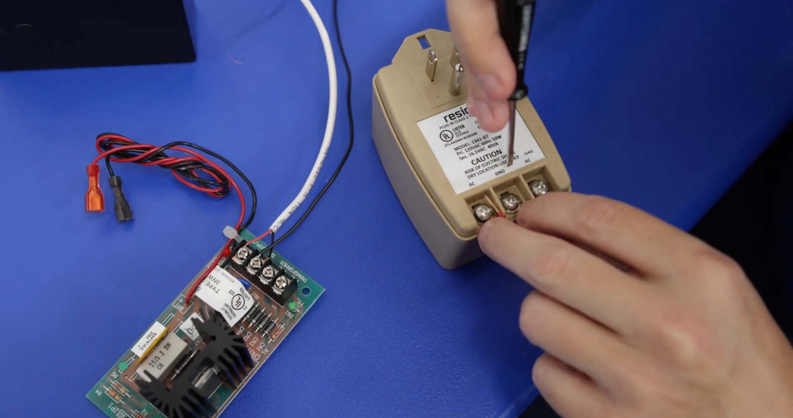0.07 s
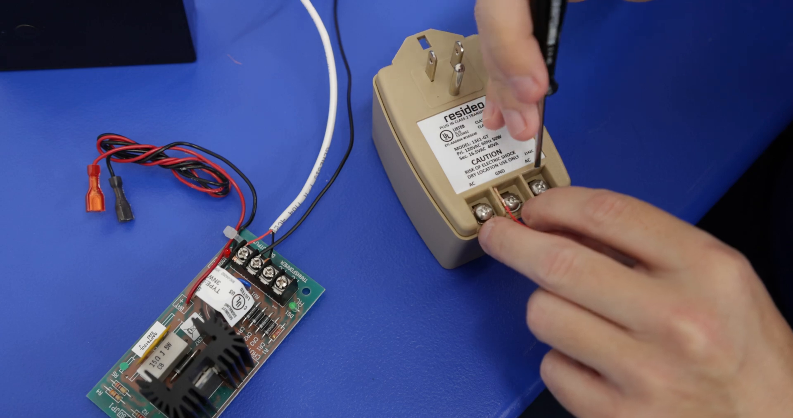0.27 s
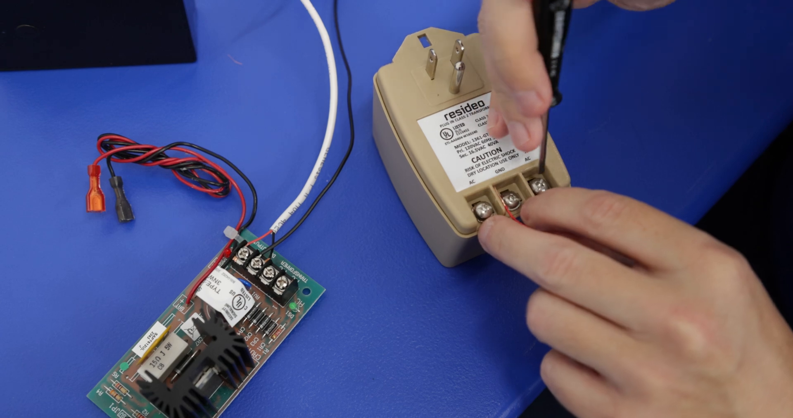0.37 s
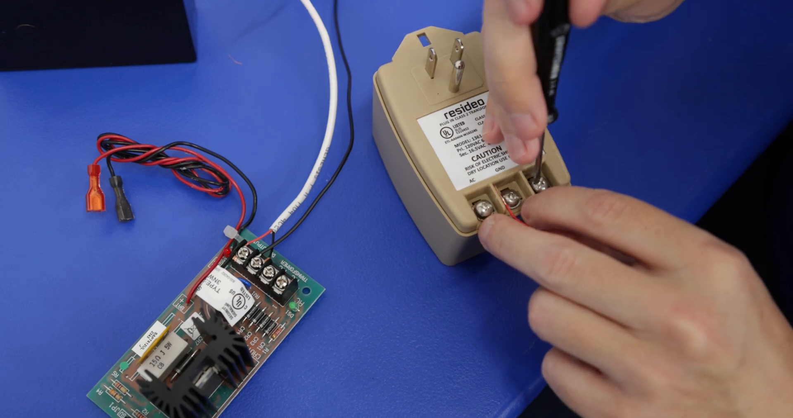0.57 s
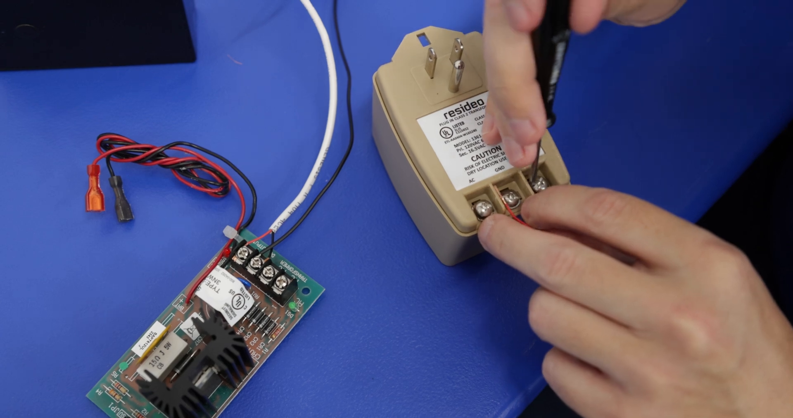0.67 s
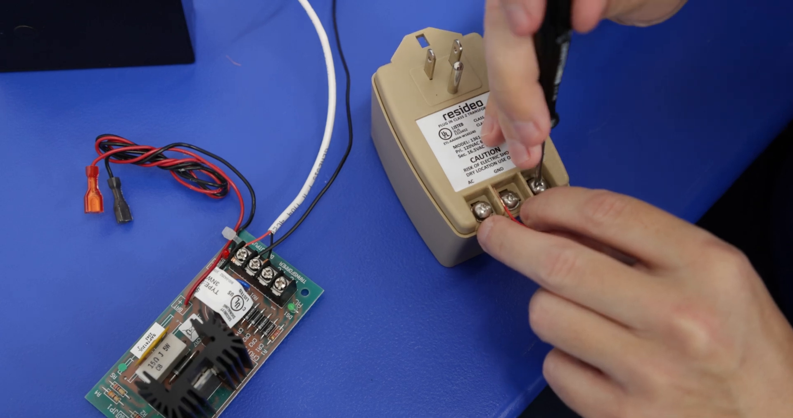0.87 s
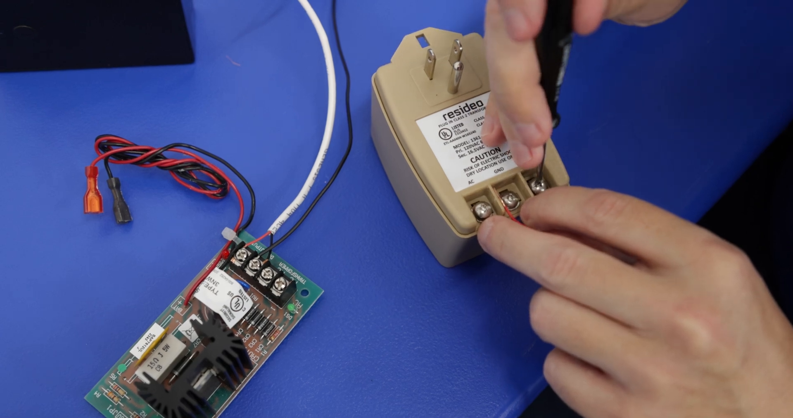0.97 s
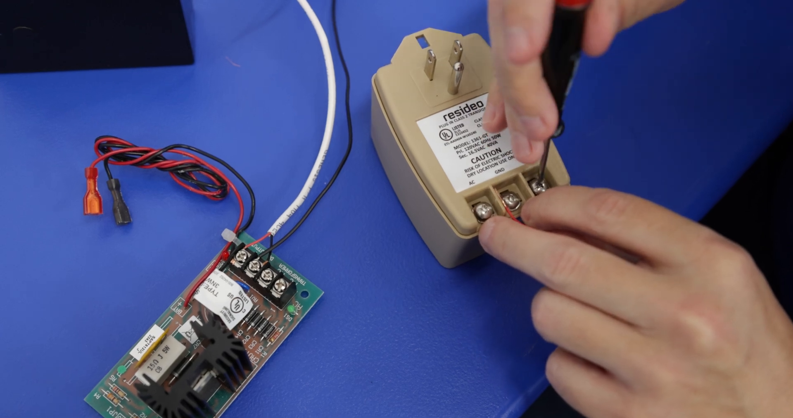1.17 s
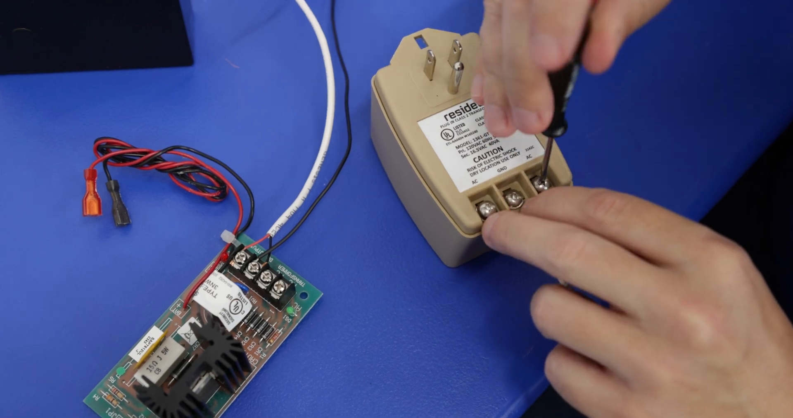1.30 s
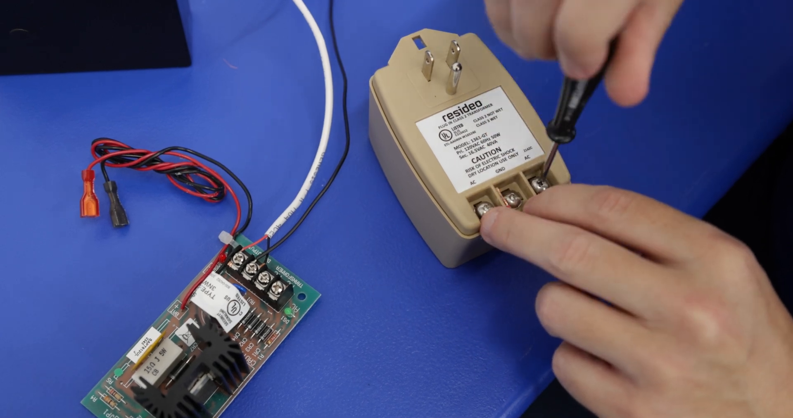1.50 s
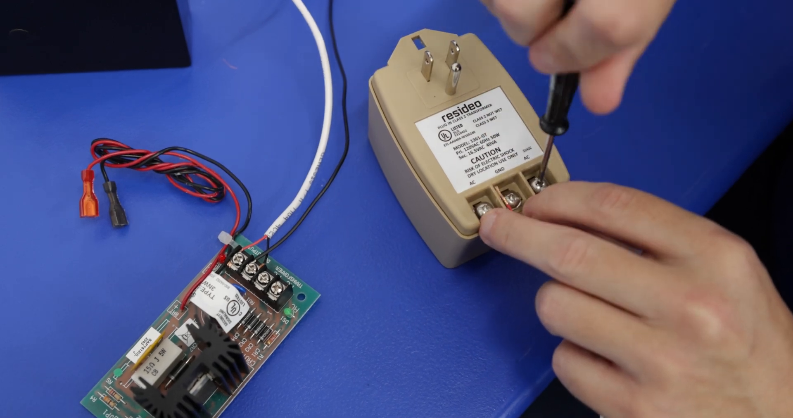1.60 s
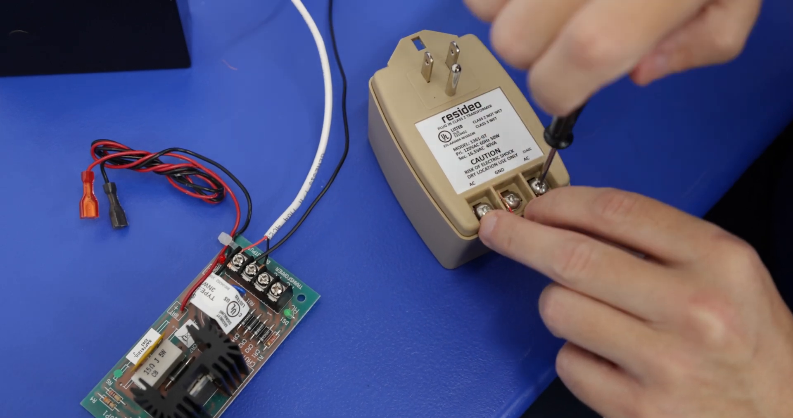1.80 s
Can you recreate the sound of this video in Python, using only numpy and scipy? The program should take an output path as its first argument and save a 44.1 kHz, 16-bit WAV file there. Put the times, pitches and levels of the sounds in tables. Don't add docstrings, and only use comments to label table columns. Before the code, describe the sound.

Close up in a quiet, faintly humming room, a screwdriver blade clacks loudly on a plastic housing, the tabletop thuds, then clustered metallic ticks and short scratchy scrapes in screw slots grow gradually fainter.

```python
import sys
import numpy as np
from scipy import signal
from scipy.io import wavfile
from scipy.ndimage import uniform_filter1d

SR = 44100
rng = np.random.default_rng(int(sys.argv[2]) if len(sys.argv) > 2 else 0)


def inscribe(sig):
    pcm = np.round(np.clip(np.atleast_2d(sig).T, -1, 1) * 32767)
    wavfile.write(sys.argv[1], SR, pcm.astype(np.int16))


def volts_from_db(level):
    exponent = np.asarray(level, float) / 20
    return 10 ** exponent


N = 81585

# frequency in Hz, level in dB, time to fall 60 dB in seconds.
STEEL_MODES = [(3610, 0.5, 0.034), (4160, 2, 0.038), (4763, -8, 0.0069), (4860, 2, .012), (6210, 0.5, 0.01),
               (6857, 4.5, 0.02), (6860, -8.5, 0.0046), (7314, 2.5, 0.013), (7593, -19, 0.011),
               (8210, -3, .01), (9500, -0.5, .01), (9200, -7, 0.0033), (11200, -16, 0.0032),
               (12000, -10, .008)]
# level spread in dB, share of pitch spread, share of ring time left.
STEEL_GRIP = (2.5, 0.03, 0.4)


def evened(x):
    return x / np.sqrt(np.mean(x ** 2) + 1e-20)


def read(points, hz):
    f, value = np.transpose(points)
    return np.interp(np.log(hz + 1), np.log(f + 1), value)


def add(mix, s, sound):
    part = mix[round(s * SR):][:len(sound)]
    part += sound[:len(part)]


def air():
    # frequency in Hz, level in dB per Hz.
    air_colour = [(15, -30), (25, -3), (73, 0.5), (136, -14), (524, -25), (645, -30.5), (1000, -29),
                  (2630, -40.5), (12500, -48), (16200, -88.5), (22000, -120)]
    # frequency in Hz, level in dB.
    mains_hum = [(60, -71), (120, -84)]
    level_db, lump_db = -64.5, 2.3
    hiss_edge_hz, hiss_drop_db = 12800, -18.5
    frames = N // 512 + 5
    hz = np.fft.rfftfreq(2048, 1 / SR)
    real, imag, lumps = rng.standard_normal((frames, 1025, 3)).T
    lumps = uniform_filter1d(lumps, size=20, axis=0)
    lumps = evened(uniform_filter1d(lumps, size=6, axis=1))
    colour_db = read(air_colour, hz) + hiss_drop_db * (hz > hiss_edge_hz)
    spectrum = (real + 1j * imag) * volts_from_db(colour_db[:, None] + lump_db * lumps)
    noise = signal.istft(spectrum, nperseg=2048, noverlap=1536)[1][:N]
    t = np.arange(N) / SR
    hum = sum(volts_from_db(db) * np.sin(2 * np.pi * f * t) for f, db in mains_hum)
    return volts_from_db(level_db) * evened(noise) + hum


def ring(modes, grip_db=0, detune=0, held=1):
    t = np.arange(SR // 4) / SR
    luck = rng.standard_normal((len(modes), 2))
    out = np.zeros(len(t))
    for k, (hz, db, t60) in enumerate(modes):
        fading = volts_from_db(db + grip_db * luck[k, 0] - 60 * t / max(t60 * held, 0.002))
        pitch = hz * (1 + detune * luck[k, 1])
        out += (-1) ** k * fading * np.sin(2 * np.pi * pitch * t)
    return out


def touch(force, body, hz, q, crack_db):
    colour = signal.iirpeak(min(hz, SR / 3), max(q, 0.3), SR)
    top = signal.butter(4, min(max(1.35 * hz, 6000), SR / 2.2), fs=SR)
    force = np.pad(force, (0, len(body)))
    force = signal.lfilter(*colour, signal.lfilter(*colour, force))
    force = signal.lfilter(*top, force)
    ringing = signal.fftconvolve(force, body)[:len(force)]
    sound = evened(ringing) + volts_from_db(crack_db) * evened(force)
    return sound / abs(sound).max()


def slides(strokes, modes, grip, crack_db):
    slips_per_s, slip_spread_db, peak_at = 4000, 2.5, 0.44
    out = np.zeros(N)
    rows = rng.random((len(strokes), 3, SR // 5))
    for (s, length, db, hz, q), (when, size, sign) in zip(strokes, rows):
        done = np.minimum(np.arange(SR // 5) / SR / length, 1)
        stroke = np.sin(np.pi * done ** (np.log(0.5) / np.log(peak_at)))
        sizes = volts_from_db(-slip_spread_db * np.log(size + 0.0069))
        slips = (when < slips_per_s / SR) * sizes * np.sign(sign - 0.5)
        sound = touch(slips * stroke, ring(modes, *grip), hz, q, crack_db)
        loudness = np.sqrt(np.sum(sound ** 2) / (length * SR))
        add(out, s, volts_from_db(db) * sound / loudness)
    return out


def steel_slides():
    # start in seconds, length in seconds, level in dB, colour in Hz, sharpness (Q) of the colour.
    steel_strokes = [(.07, 0.058, -91, 7000, 1.1), (.309, 0.0061, -32.5, 7570, 7.2),
                     (.309, 0.0095, -46, 4520, 2.9), (.308, .012, -58, 13570, 1.2),
                     (.724, 0.026, -54, 4000, 3.8), (.724, 0.023, -60.5, 7030, 1.3),
                     (.756, 0.05, -64.5, 4700, 0.31), (.82, 0.025, -66.5, 4400, 1),
                     (.953, 0.041, -58.5, 13900, 2.2), (.957, 0.061, -59.5, 7180, 0.42),
                     (1.025, 0.032, -59.5, 6830, 0.33), (1.105, 0.017, -76, 6100, 1.7),
                     (1.367, 0.07, -70, 7200, 7.4), (1.385, 0.039, -71.5, 8340, 3.2),
                     (1.37, 0.043, -87, 4070, 0.59), (1.49, 0.086, -75, 6600, 2),
                     (1.615, 0.13, -72.5, 6800, 1.7), (1.645, 0.074, -66.5, 12800, 0.84),
                     (1.73, .13, -78.5, 6530, 4.2), (1.74, 0.11, -81.5, 3000, 2)]
    return slides(steel_strokes, STEEL_MODES, STEEL_GRIP, crack_db=4.37)


def case_modes():
    case_tones = [269, 446, 619, 740, 850, 957, 1078, 1264, 1503, 1665, 1950, 2300, 2742, 3115]
    # level in dB, time to fall 60 dB in seconds.
    case_ringing = [(-15.5, 0.13), (-10.5, 0.069), (2.5, 0.038), (-11.5, 0.11), (-7, 0.074), (2.5, .04),
                    (-6, 0.048), (-25, 0.13), (-15, 0.096), (-2.5, .04), (-17.5, 0.026), (-22, .03),
                    (0, 0.03), (-6, 0.025)]
    return [(hz, db, t60) for hz, (db, t60) in zip(case_tones, case_ringing)]


def ticks():
    # start in seconds, case level in dB, case colour in Hz, steel level in dB, steel colour in Hz.
    sharp_contacts = [(.122, -64, 930, -76, 4200), (0.2374, -30.5, 2770, -20.5, 7640),
                      (0.2356, -5.5, 895, -16.5, 3855), (.2440, -38, 1538, -29, 4500),
                      (.3077, -71.5, 993, -37.5, 8500), (0.3114, -56, 839, -35.5, 7800),
                      (.412, -80, 1480, -58, 4730), (.477, -72.5, 2540, -68.5, 4180),
                      (.7236, -41, 905, -43, 6940), (0.9546, -47.5, 1100, -29.5, 10250),
                      (.9652, -50.5, 930, -43, 8400), (.9715, -44, 950, -32.5, 9300),
                      (0.9775, -36, 970, -50, 9800), (.9885, -44, 1026, -53.5, 9500),
                      (.9922, -37, 1026, -30, 7560), (1.0365, -68, 940, -41.5, 5740),
                      (1.043, -39, 1190, -41.5, 7140), (1.1203, -41, 550, -39.5, 6150),
                      (1.5053, -49.5, 2400, -34.5, 7340), (1.5575, -60, 2750, -82, 9500),
                      (1.655, -66, 2750, -82, 6800), (1.752, -70, 2840, -54.5, 6600),
                      (1.804, -64, 2900, -59, 10200)]
    rebound_db_per_ms = -27
    out = np.zeros(N)
    rows = rng.standard_normal((len(sharp_contacts), 130))
    fall = volts_from_db(rebound_db_per_ms * np.arange(130) / SR * 1000)
    blow = np.hanning(7)
    case = ring(case_modes())
    for (s, case_db, case_hz, steel_db, steel_hz), rebounds in zip(sharp_contacts, rows):
        steel = ring(STEEL_MODES, *STEEL_GRIP)
        knock = touch(blow, case, case_hz, q=0.48, crack_db=-8.5)
        click = touch(rebounds * fall, steel, steel_hz, q=1.0, crack_db=-4.5)
        add(out, s, -volts_from_db(case_db) * knock)
        add(out, s, volts_from_db(steel_db) * click)
    return out


def rattle():
    start_s, level_db, t60_s, colour_hz = 0.2362, -39.5, 0.1, 3000
    out = np.zeros(N)
    t = np.arange(SR // 4) / SR
    shiver = signal.lfilter(*signal.iirpeak(colour_hz, 0.5, SR), rng.standard_normal(len(t)))
    add(out, start_s, volts_from_db(level_db - 60 * t / t60_s) * evened(shiver))
    return out


def thud():
    # frequency in Hz, level in dB, time to fall 60 dB in seconds.
    table_modes = [(123, -35, 0.36), (59.4, -50, 0.25), (171, -41.5, 0.17), (225, -45, 0.24),
                   (345, -40.5, 0.1)]
    start_s, rise_s = 0.238, 0.032
    out = np.zeros(N)
    body = ring(table_modes, held=0.75)
    swell = np.minimum(np.arange(len(body)) / SR / rise_s, 1) ** 2
    add(out, start_s, body * swell)
    return out


def case_slides():
    # start in seconds, length in seconds, level in dB, colour in Hz, sharpness (Q) of the colour.
    case_strokes = [(.724, 0.037, -50.5, 1128, 1.08), (.752, 0.059, -59, 1170, 0.39),
                    (.822, 0.033, -59.5, 1770, 3.5), (.822, 0.018, -63.5, 910, 1.45),
                    (.958, 0.051, -43.5, 930, 1.64), (1.028, 0.029, -48, 1004, 1.6),
                    (1.04, 0.038, -62, 2500, 0.83), (1.104, 0.071, -62, 935, 0.24),
                    (1.37, 0.053, -74, 800, 8.2), (1.505, 0.029, -63, 2060, 0.74),
                    (1.625, 0.093, -62.5, 727, 0.97), (1.63, 0.065, -70, 2930, 4.5),
                    (1.81, 0.039, -75, 740, 1.2)]
    return slides(case_strokes, case_modes(), (2.5, 0, 0.5), crack_db=-4.0)


def room(x):
    # frequency in Hz, time to fall 60 dB in seconds.
    tail_times = [(150, 0.9), (600, 0.31), (2000, 0.46), (5000, 0.24), (12000, 0.087)]
    # delay in seconds, level in dB.
    near_echoes = [
        (.0021, -22.5),
        (.0047, -21),
        (.0083, -27.5),
    ]
    tail_db, gap_s = -19.5, 0.0037
    taps = rng.standard_normal(SR)
    taps *= np.clip(np.arange(SR) / SR / gap_s - 1, 0, 1)
    hz, t, z = signal.stft(taps, SR, nperseg=256)
    dying = volts_from_db(-60 * t / read(tail_times, hz)[:, None])
    tail = signal.istft(z * dying, SR, nperseg=256)[1]
    tail = volts_from_db(tail_db) * tail / np.linalg.norm(tail)
    for s, db in near_echoes:
        add(tail, s, np.array([volts_from_db(db)]))
    return x + signal.fftconvolve(x, tail)[:N]


def scene():
    tool = steel_slides() + ticks() + rattle() + case_slides()
    tool = signal.lfilter(*signal.butter(2, 9740, fs=SR), tool)
    return (room(tool) + thud() + air())[None]


def low_pass(x):
    return signal.sosfilt(signal.butter(12, 16730, fs=SR, output="sos"), x)


def record(dry):
    return low_pass(dry)


dry = scene()
out = record(dry)
inscribe(out)
```